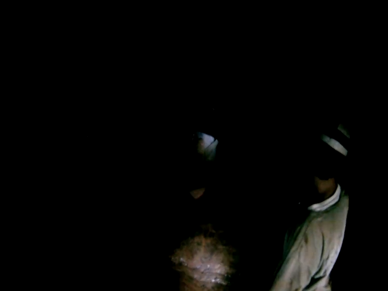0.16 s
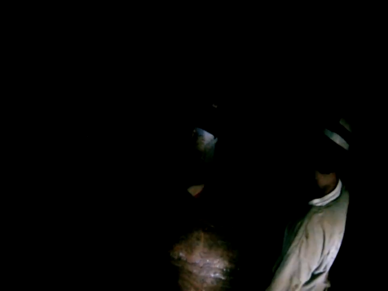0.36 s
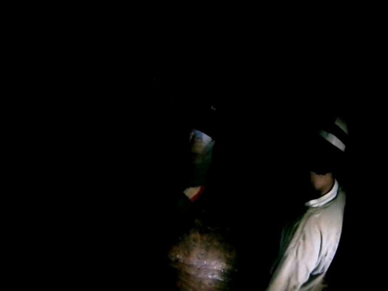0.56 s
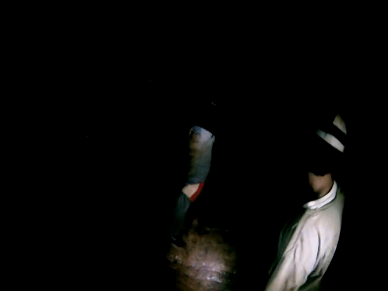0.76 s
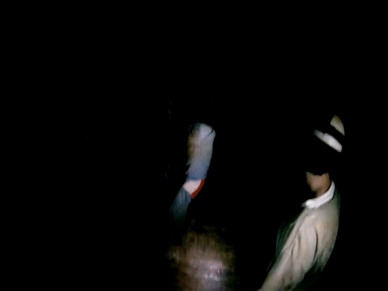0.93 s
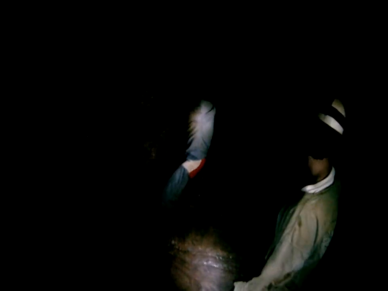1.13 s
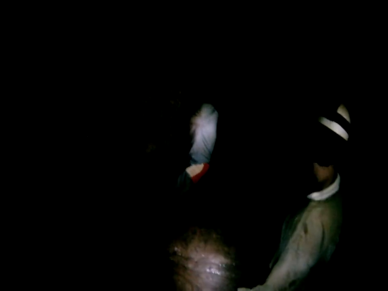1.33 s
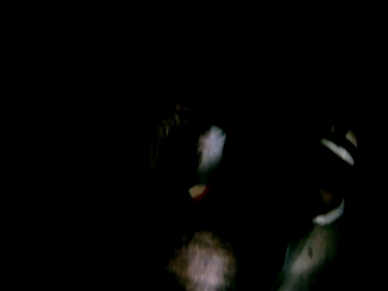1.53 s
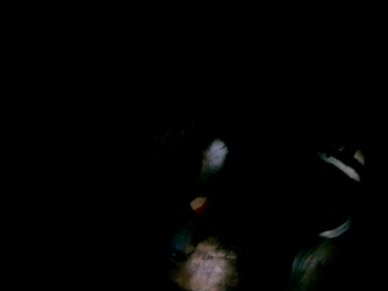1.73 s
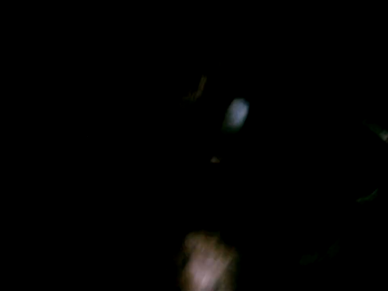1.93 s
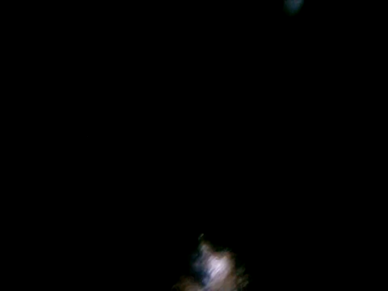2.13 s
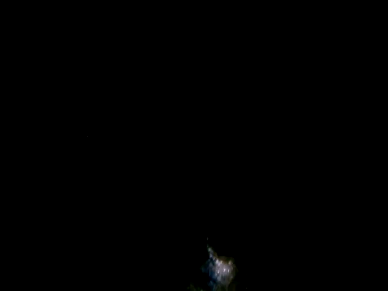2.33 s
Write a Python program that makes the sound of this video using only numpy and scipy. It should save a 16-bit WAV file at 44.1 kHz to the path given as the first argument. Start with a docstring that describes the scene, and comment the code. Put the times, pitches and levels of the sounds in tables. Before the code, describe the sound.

Running water hisses evenly throughout in a cave passage, coloured hollow and nasal by a sealed camera housing, with gritty low-fidelity treble. At about 0.2 s the wearer's movement gives a loud, deep, short knock with a bouncing tail and tiny buzz; a dull thump follows near 0.4 s. Faint low thumps and rumble continue, slightly stronger around 2.1 s. Small drops tick near 0.1, 1.2-1.35 and 2.05 s.

```python
"""In a cave passage, water runs steadily, heard from inside a sealed camera housing that colours the hiss.
Water is patchy noise and fine spray sent through the housing's resonances; a few drops tick and ring it.
The wearer moves: a knock bounces on the mount, dull thumps follow (short fading tones), a brief buzz rattles
the housing, and a low rumble of filtered noise comes and goes.
The recorder holds each of its 12 kHz samples, which mirrors the spectrum into the treble."""
import sys
import numpy as np
from scipy import signal
from scipy.fft import rfft, irfft, next_fast_len
from scipy.io import wavfile
from scipy.ndimage import uniform_filter1d, map_coordinates

SR = 44100
rng = np.random.default_rng(int(sys.argv[2]) if len(sys.argv) > 2 else 0)


def persist_wave(psi):
    """Save psi, clipped to +-1, as 16-bit WAV."""
    counts = np.round(np.clip(psi, -1, 1) * 32767).astype(np.int16)
    wavfile.write(sys.argv[1], SR, np.atleast_2d(counts).T)


N = 105840  # length in samples, 2.4 s

# How loud the water runs before its flutter: t/s, level/dB
WATER_LEVEL = [(0, -40), (.3, -41), (1.2, -39.5), (2.4, -40)]
# Resonances of the housing and passage: f/Hz, width/Hz, level/dB
HOUSING_RESONANCES = [(1158, 121, -2.5), (1460, 117, -10), (2044, 287, -1), (2553, 303, -4),
                      (2649, 122, 0.5), (2905, 138, -3.5), (3160, 260, -6.5), (3744, 310, -5.5),
                      (4300, 230, -13), (4972, 268, -6.5), (5594, 310, -16)]
# Tone of the broad wash under the resonances: f/Hz, level/dB
WASH_TONE = [(60, -11), (150, -12), (400, -12.5), (900, -12.5), (2500, -8), (4500, -16.5), (6000, -20)]
# Single drops: t/s, peak level/dB
DROP_HITS = [(0.0717, -31.5), (1.1812, -26.5), (1.2965, -29), (1.3468, -33), (2.0477, -27)]
# Soft blows on the mount: t/s, peak level/dB, pitch f/Hz, rise/s, time to fall 60 dB/s, shell ring level/dB
MOUNT_BLOWS = [(.211, -11.5, 83.7, .1, .035, -33.5), (0.2444, -23, 84, .015, .032, -33.5),
               (0.2756, -28, 80, .01, 0.032, -47), (.297, -37, 76, .015, 0.042, -58),
               (.379, -23, 57.7, .2, 0.05, -45), (0.4044, -21, 55, 0.014, .16, -43),
               (.615, -41, 32, .01, 0.11, -56), (.904, -39, 52.9, .06, .17, -63),
               (1.175, -42.5, 53.3, 0.015, .15, -69), (1.345, -45.5, 53, .03, 0.18, -64),
               (1.495, -46.5, 55.3, 0.026, 0.2, -66), (1.598, -34, 70, .006, 0.045, -60),
               (2.036, -40, 49.4, .01, 0.073, -58), (2.084, -29.5, 39.3, 0.01, 0.09, -57),
               (2.152, -35, 52, 0.011, 0.18, -60), (2.2133, -39, 54.5, .03, 0.13, -67),
               (2.296, -41, 34, .01, 0.13, -66)]
# Modes of the shell: f/Hz, level/dB added to the ring level of each blow
SHELL_MODES = [(157, 0), (215, -8.5), (290, -8)]
# How loud the lumpy rumble is, over time: t/s, level/dB
RUMBLE_LEVEL = [(0, -52), (.12, -58), (.3, -47), (.45, -48), (.6, -48), (.7, -54), (.9, -53), (1.1, -54.5),
                (1.4, -54), (1.55, -54), (1.7, -55), (1.95, -50), (2.03, -49), (2.15, -51), (2.3, -52),
                (2.4, -45)]
# Tone of the shaking mount: f/Hz, level/dB
MOUNT_TONE = [(15, -2), (30, -5), (44, -8), (54, 2), (66, -4.5), (110, -17), (200, -29), (300, -35)]

PATCHY_DB, FLUTTER_DB, FLUTTER_PER_S = 0.51, 0.43, 7.9
SPRAY_PER_S, SPRAY_DB, SPRAY_SPREAD_DB = 900, -13.5, 4
RATTLE_START_S, RATTLE_LONG_S, RATTLE_DB = 0.218, 0.055, -43
RATTLE_HZ, RATTLE_WIDE_HZ = 1150, 70
LUMPS_DB, LUMPS_PER_S = 1.4, 14
HOLD_HZ, OUT_HZ, TOP_HZ = 12000, 48000, 15310  # sample rate, rate of the held steps, band limit


def amp(db):
    """Turn dB into a plain factor."""
    return 10 ** (np.asarray(db) / 20)


def unit(x):
    """Scale x to an average (RMS) level of 1."""
    return x / np.sqrt(np.mean(x ** 2) + 1e-20)


def along(points, hz):
    """Read a table of (f/Hz, value) at any frequency, on a log axis."""
    f, v = np.transpose(points)
    return np.interp(np.log(hz + 1), np.log(f + 1), v)


def curve(rows):
    """Read a table of (t/s, value) at every sample."""
    return np.interp(np.arange(N) / SR, *np.transpose(rows))


def wobble(rate):
    """A smooth random curve through `rate` random points a second."""
    points = rng.standard_normal(int(N * rate / SR) + 4)
    return map_coordinates(points, [np.arange(N) * rate / SR])


def filtered(x, response):
    """Shape x by a response given as a function of frequency."""
    size = next_fast_len(N + SR // 2)  # spare room for the ringing
    spectrum = rfft(x, size) * response(np.fft.rfftfreq(size, 1 / SR))
    return irfft(spectrum, size)[..., :N]


def peak(f, hz, wide_hz):
    """One resonance, which starts ringing only once it is struck."""
    damping = 1j * f * wide_hz
    return damping / (hz * hz - f * f + damping)


def housing(f):
    """All resonances of the housing, with the sign flipped from one to the next."""
    return sum((-1) ** k * amp(db) * peak(f, hz, wide_hz)
               for k, (hz, wide_hz, db) in enumerate(HOUSING_RESONANCES))


def patchy(depth_db):
    """White noise whose gain varies in random patches of time and frequency."""
    z = signal.stft(rng.standard_normal(N + 512), nperseg=512)[2]
    field = rng.standard_normal(z.shape)
    field = uniform_filter1d(field, 6, 0)  # smooth over frequency
    field = uniform_filter1d(field, 10, 1)  # smooth over time
    noise = signal.istft(z * amp(depth_db * unit(field)), nperseg=512)[1]
    return unit(noise[:N])


def water():
    """Hiss and fine spray excite the housing; a broad wash fills the valleys between its resonances."""
    sizes = amp(SPRAY_SPREAD_DB * rng.exponential(size=N)) * rng.standard_normal(N)
    spray = unit(sizes * (rng.random(N) < SPRAY_PER_S / SR))
    hiss = filtered(patchy(PATCHY_DB) + amp(SPRAY_DB) * spray, housing)
    wash = filtered(patchy(PATCHY_DB), lambda f: amp(along(WASH_TONE, f)))
    level_db = curve(WATER_LEVEL) + FLUTTER_DB * wobble(FLUTTER_PER_S)
    return amp(level_db) * unit(hiss + wash)


def thumps():
    """Each blow swells and dies at its own pitch and rings the shell."""
    out = np.zeros(N + SR)
    t = np.arange(SR // 2) / SR
    for s, db, hz, rise, t60, shell_db in MOUNT_BLOWS:
        swell = (1 - np.exp(-t / rise)) ** 3
        envelope = swell * amp(-60 * t / t60)
        envelope = envelope / envelope.max()
        tone = amp(db) * np.sin(2 * np.pi * hz * t)
        ring = sum(amp(shell_db + level) * np.sin(2 * np.pi * mode_hz * t) for mode_hz, level in SHELL_MODES)
        out[round(s * SR):][:len(t)] -= envelope * (tone + ring)  # the first swing goes down
    return out[:N]


def rattle():
    """The hard knock shakes the housing for a moment: narrow noise that swells and fades."""
    progress = np.clip((np.arange(N) / SR - RATTLE_START_S) / RATTLE_LONG_S, 0, 1)
    buzz = filtered(rng.standard_normal(N), lambda f: peak(f, RATTLE_HZ, RATTLE_WIDE_HZ))
    return amp(RATTLE_DB) * np.sin(np.pi * progress) * unit(buzz)


def drops():
    """Single drops tick on the housing and ring it."""
    taps = np.zeros(N)
    for s, db in DROP_HITS:
        taps[round(s * SR)] = amp(db)
    one_ring = filtered(np.eye(1, N)[0], housing)  # answer to a single tap of size 1
    return filtered(taps, housing) / np.abs(one_ring).max()


def rumble():
    """Body motion shakes the mount in lumps: low noise with an uneven level."""
    noise = filtered(rng.standard_normal(N), lambda f: amp(along(MOUNT_TONE, f)))
    lumpy = unit(noise * amp(LUMPS_DB * wobble(LUMPS_PER_S)))
    return amp(curve(RUMBLE_LEVEL)) * lumpy


def scene():
    """Add all the sounds into one channel."""
    return (water() + drops() + thumps() + rattle() + rumble())[None]


def hold(f):
    """Holding each sample as a run of equal steps dulls the treble and delays it; a band limit cuts the top."""
    shade = np.sinc(f / HOLD_HZ) / np.sinc(f / OUT_HZ)
    delay = np.exp(-1j * np.pi * f / HOLD_HZ)
    return shade * delay * (f < TOP_HZ)


def record(dry):
    """Sampling at 12 kHz adds a mirror image of the sound above 6 kHz; holding each sample shades it."""
    base = filtered(dry, lambda f: f < HOLD_HZ / 2)
    sampled = base * (1 + 2 * np.cos(2 * np.pi * HOLD_HZ * np.arange(N) / SR))
    return filtered(sampled, hold)


dry = scene()
out = record(dry)
persist_wave(out)
```